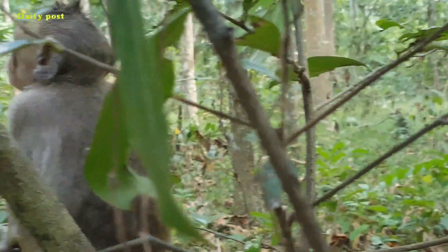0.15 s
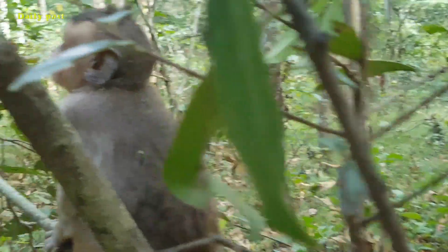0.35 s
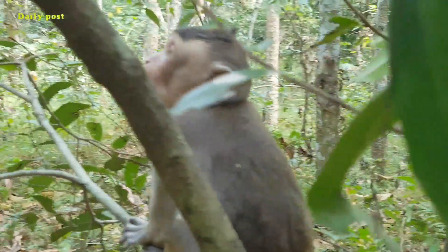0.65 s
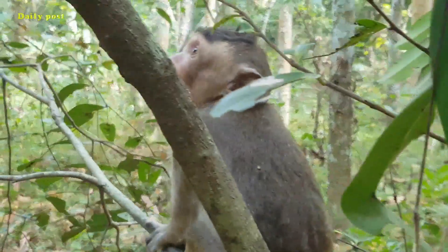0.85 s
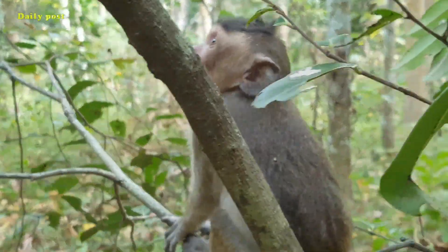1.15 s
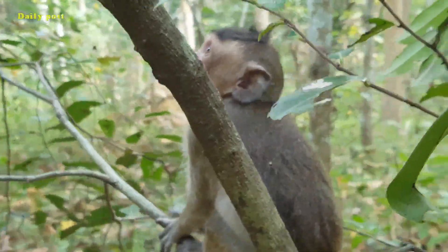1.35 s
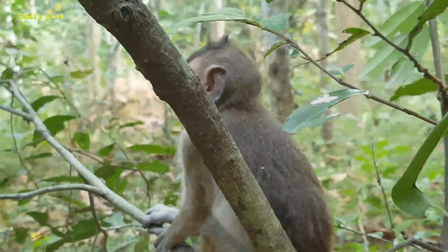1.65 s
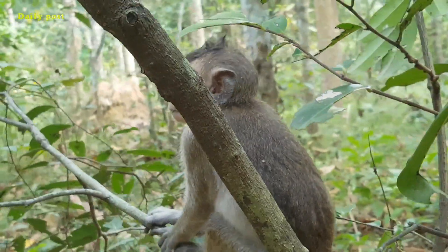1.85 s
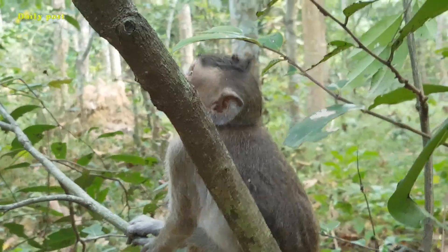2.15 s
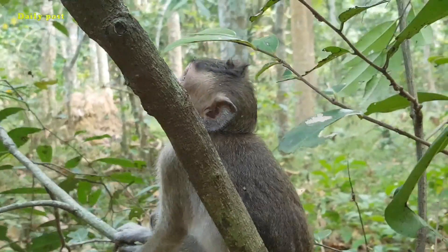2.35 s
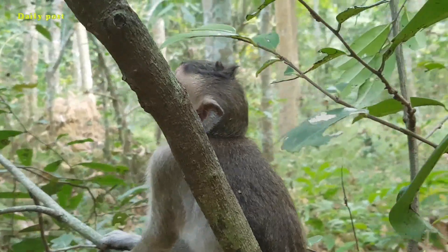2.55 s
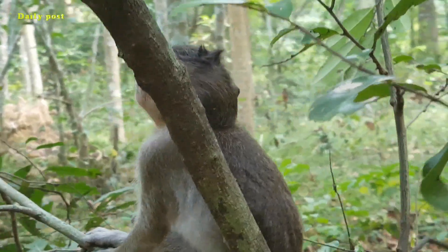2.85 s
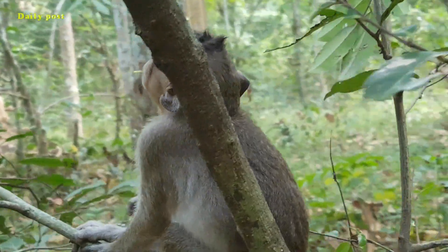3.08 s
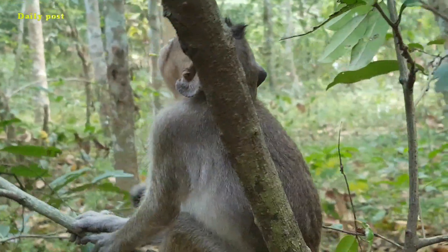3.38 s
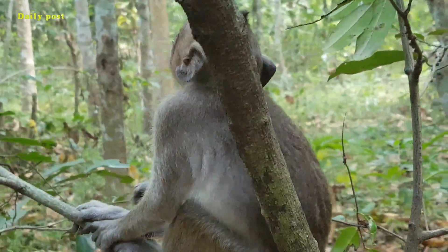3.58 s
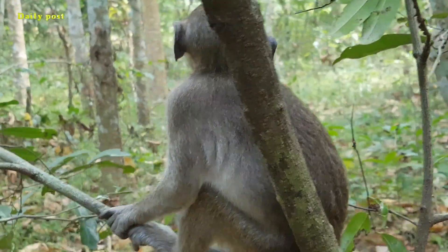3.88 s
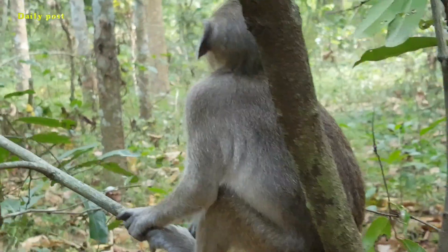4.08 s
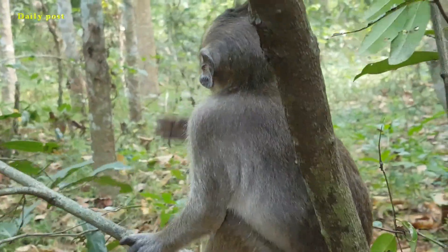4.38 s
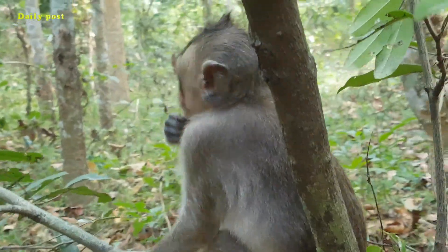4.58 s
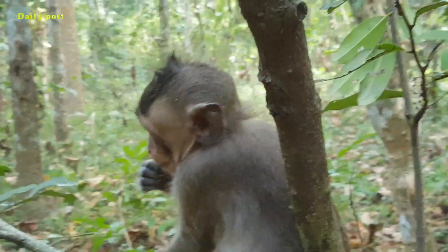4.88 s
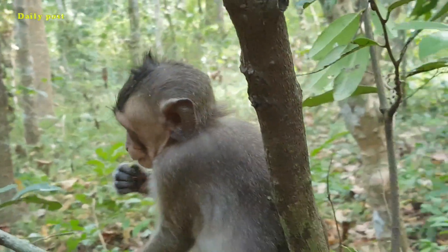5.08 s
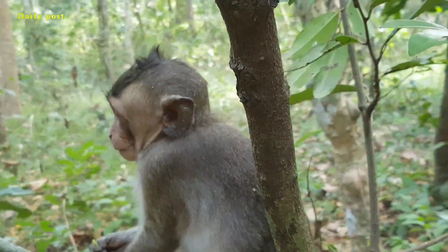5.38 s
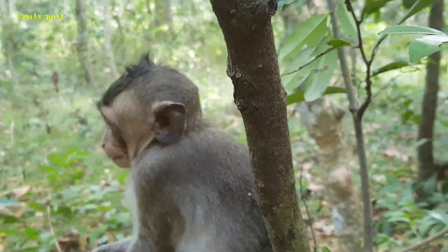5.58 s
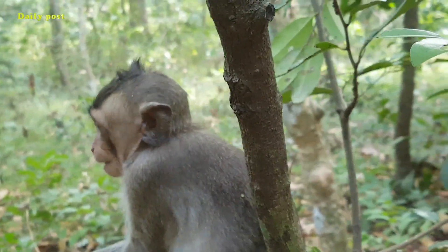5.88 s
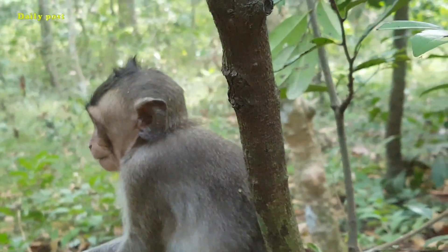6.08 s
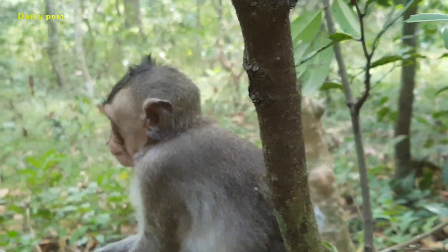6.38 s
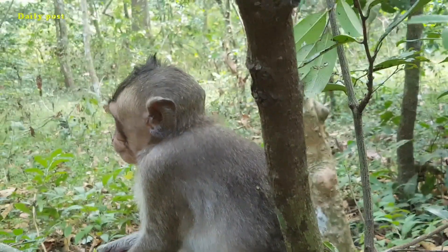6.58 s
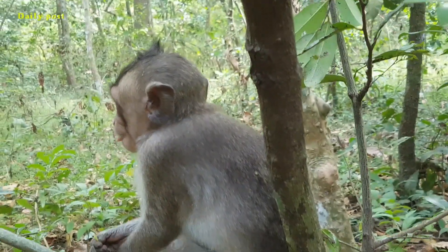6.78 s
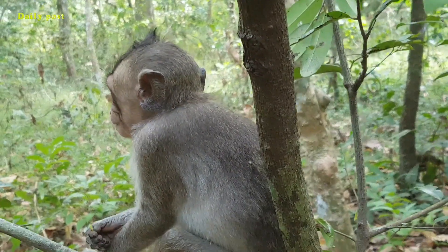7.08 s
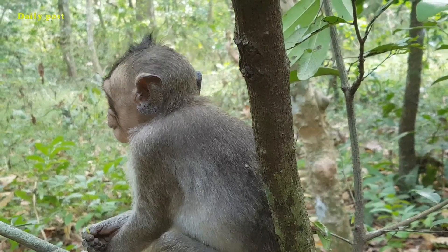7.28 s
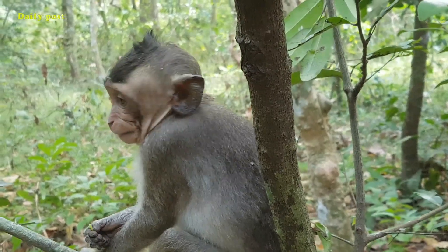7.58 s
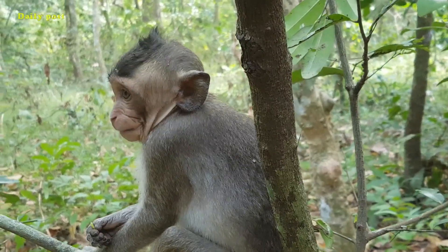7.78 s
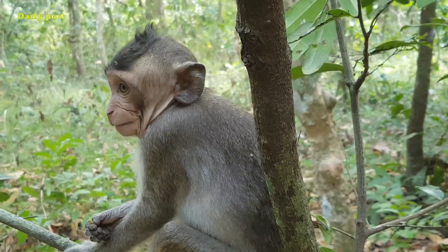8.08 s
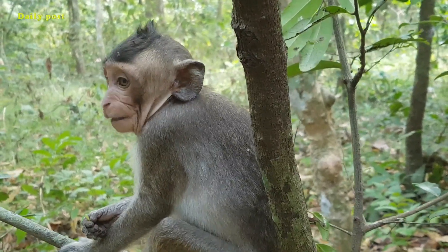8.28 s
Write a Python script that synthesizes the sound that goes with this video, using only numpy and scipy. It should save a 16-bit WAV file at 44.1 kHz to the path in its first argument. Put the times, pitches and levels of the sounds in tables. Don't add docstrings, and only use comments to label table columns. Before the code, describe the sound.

A dense, shrill cicada chorus drones continuously through a forest, its tones beating and shimmering, over faint insect hiss, soft air and low rumble. Close to the microphone, dry leaves rustle in uneven bursts as a small monkey shifts on a branch. Stalks crack early and near three seconds; a twig snaps sharply just after four. A light rustle follows around six, then mostly insects remain.

```python
import sys
import numpy as np
from scipy import signal
from scipy.fft import rfft, irfft
from scipy.io import wavfile
from scipy.ndimage import uniform_filter1d

SR = 44100
rng = np.random.default_rng(int(sys.argv[2]) if len(sys.argv) > 2 else 0)


def transcribe(u):
    v = np.clip(np.atleast_2d(u).T, -1, 1)
    q = np.round(v * 32767).astype(np.int16)
    wavfile.write(sys.argv[1], SR, q)


def undo_db(level):
    steps = np.asarray(level, float) / 20
    return 10 ** steps


N = 372644


def level(x, db):
    return x * undo_db(db) / np.sqrt(np.mean(x ** 2))


def curve(table):
    s, *columns = np.transpose(table)
    return [np.interp(np.arange(N) / SR, s, c) for c in columns]


def on_hz(points, n):
    hz, value = np.transpose(points)
    return np.interp(np.log(np.arange(n // 2 + 1) * SR / n + 1), np.log(hz), value)


def colour(x, points):
    cepstrum = irfft(on_hz(points, 2048) * np.log(10) / 20)
    cepstrum[1:1024] *= 2
    response = irfft(np.exp(rfft(cepstrum[:1025], 2048)))
    return signal.fftconvolve(x, response[None], axes=1)[:, :N]


def walk(rate_hz, n=N):
    hold = int(SR / rate_hz)
    held = np.repeat(rng.standard_normal(n // 200), hold)[:n]
    return 1.3 * uniform_filter1d(uniform_filter1d(held, hold), hold)


def sides(x, pan_db, lag):
    return np.array([np.roll(x, lag) * undo_db(pan_db / 2), x * undo_db(-pan_db / 2)])


# multiple_of_stroke_rate, level_db
STROKE = [(1, -42), (2, -38), (3, -43), (4, -23), (5, 4.5), (6, -18.5), (7, -38), (8, -27), (9, -22),
          (10, 4), (11, -14), (12, -24.5), (13, -25), (14, -16.5), (15, -0.5), (16, -16.5), (17, -20.5),
          (18, -30), (19, -28.5), (20, -4), (21, -18.5), (22, -25), (23, -24), (24, -30), (25, -17.5),
          (26, -26), (27, -36), (28, -40), (29, -37)]
INSECTS = 7


def crowd(n, rate_hz, spread, wander, db, tilt_db, swell_db):
    order = np.arange(len(STROKE)) + 1
    gain = undo_db(np.array(STROKE)[:, 1] + tilt_db * np.log2(order / 5))
    out = np.zeros(n)
    for place in np.linspace(-1.5, 1.5, INSECTS):
        phase = 2 * np.pi * rng.random(len(order))
        shape = irfft(np.r_[0, gain * np.exp(1j * phase)], 2048)
        hz = rate_hz * (1 + spread * place + wander * walk(22, n))
        cycle = np.cumsum(hz) / SR % 1
        out += np.interp(cycle, np.arange(2049) / 2048, np.r_[shape, shape[0]])
    return level(out, db) * undo_db(swell_db * np.linspace(-.5, .5, n))


# stroke_rate_hz, spread_between_insects_share, wander_share, level_db, tilt_db_per_octave,
# swell_start_to_end_db
CROWDS = [(543.03, .0022, .005, 0, 0.5, -7.7), (528.2, .009, .012, -10.5, 2.5, -4),
          (562.8, .016, .02, -16.5, -2, -0.5), (502.6, .018, .025, -21, -3, 1.5)]
# start_s, rib_tone_level_db, left_minus_right_db
CHORUS = [(0, -39, 2.5), (.5, -38, 3.5), (1, -37, 6), (1.5, -40.5, 5), (2, -37.5, 4), (2.4, -40.5, 4),
          (2.75, -36.5, 4.5), (3.2, -39, 3), (3.7, -40, 3), (4.3, -38, 3.5), (4.8, -40.5, 4),
          (5.4, -38.5, 3.5), (5.9, -39, 4.5), (6.4, -38.5, 2.5), (6.9, -38.5, 4.5), (7.5, -42, 3.5),
          (8, -39.5, 3.5), (8.45, -41.5, 3)]
SPLIT_HZ = [0, 4000, 6800, 9500, 22050]
# level_at_mean_effort_db, effort_followed_share, lean_followed_share, own_swell_db
TONES = [(-39, 1.13, 1.08, 1.13), (-40, 0.35, 0.58, 0.97), (-45, .1, 1.08, 1.75),
         (-44.5, 0.13, 0.033, 2.17)]
EFFORT_DB, SWAY_DB, SWELLS_HZ = -39, 1.5, 9
FOREST_T60_S, STEADY_S = 0.86, 0.16


def cicadas():
    song = sum(crowd(N + SR, *row) for row in CROWDS)
    decay = undo_db(-60 * np.arange(SR) / SR / FOREST_T60_S)
    scatter = rfft(rng.standard_normal((2, SR)) * decay, N + SR)
    scrambled = irfft(rfft(song) * scatter / abs(scatter), N + SR)
    wash = rfft(scrambled[:, SR:])
    hz = np.arange(wash.shape[1]) * SR / N
    effort_db, lean_db = curve(CHORUS)
    out = 0
    for lo, hi, (mean_db, follow, share, swell_db) in zip(SPLIT_HZ, SPLIT_HZ[1:], TONES):
        db = mean_db + follow * (effort_db - EFFORT_DB) + swell_db * walk(SWELLS_HZ)
        pan_db = lean_db + SWAY_DB * walk(SWELLS_HZ)
        tone = irfft(wash * ((hz >= lo) & (hz < hi)), N)
        tone = tone / tone.std(axis=1, keepdims=True)
        slow_power = uniform_filter1d(tone.mean(axis=0) ** 2, int(STEADY_S * SR))
        tone = tone / np.sqrt(slow_power + 0.047)
        out = out + tone * undo_db(db + share * np.array([pan_db, -pan_db]) / 2)
    return out


# centre_hz, width_hz, level_db,
# left_minus_right_db
FAR_BANDS = [(6920, 100, -63, 1.5), (4220, 73, -75, 13), (6340, 190, -62, 1), (1700, 190, -70, -16),
             (6800, 680, -75, 1), (8360, 150, -62.5, 1), (2985, 130, -63.5, 11), (14900, 700, -69, 14)]


def far_insects():
    hz = np.arange(N // 2 + 1) * SR / N
    out = 0
    for centre_hz, width_hz, db, pan_db in FAR_BANDS:
        bell = np.exp(-((hz - centre_hz) / width_hz) ** 2)
        band = irfft(rfft(rng.standard_normal((2, N))) * bell, N)
        out = out + level(band, db) * undo_db(np.array([[pan_db], [-pan_db]]) / 2)
    return out


# frequency_hz, density_db_per_hz
AIR = [(20, 0), (35, -16.5), (52, 2.5), (75, -2), (110, -2.5), (170, -8.5), (240, -16.5), (500, -16.5),
       (1200, -21.5), (2000, -23.5), (3800, -21), (7300, -34), (12000, -21), (15800, -26.5)]
# frequency_hz, common_share
ALIKE = [(20, 0.84), (60, 1), (130, 0.9), (290, .58), (640, 0.42), (1410, 0), (3100, 0.18), (20000, 0.097)]
AIR_DB, HUM_HZ, HUM_DB = -50.5, 51, -69.5


def air():
    mid, side = rfft(rng.standard_normal((2, N))) * undo_db(on_hz(AIR, N))
    alike = np.clip(on_hz(ALIKE, N), 0, 1)
    mid, side = mid * np.sqrt(1 + alike), side * np.sqrt(1 - alike)
    noise = irfft(np.array([mid + side, mid - side]), N)
    hum_phase = 2 * np.pi * np.cumsum(HUM_HZ + 1.5 * walk(2.5)) / SR
    hum = undo_db(HUM_DB + 3 * walk(5)) * np.sin(hum_phase)
    return level(noise, AIR_DB) * undo_db(0.28 * walk(1.28)) + hum


# loudest_s, level_db, rise_s, settle_s
STIRS = [(.02, -46, 0.022, 0.032), (.4, -51.5, 0.28, 0.13), (.52, -47, 0.097, 0.032),
         (.69, -42.5, 0.16, 0.17), (.745, -46, .12, .15), (.83, -44, 0.13, .14), (1.31, -58.5, 0.23, 0.46),
         (2.02, -51.5, 0.062, 0.45), (2.42, -63, .15, 0.13), (2.64, -39.5, .13, 0.18),
         (2.75, -46, .1, 0.056), (2.85, -41, 0.19, 0.12), (3.04, -52, 0.052, 0.22), (3.32, -45, 0.22, 0.11),
         (3.43, -52, 0.041, .22), (3.69, -57.5, 0.47, .25), (3.93, -50, 0.16, 0.12),
         (4.17, -44, 0.05, 0.24), (4.24, -39.5, 0.19, .2), (4.349, -33, 0.042, 0.05),
         (4.44, -42.5, .1, .17), (4.89, -54, 0.73, 0.21), (5.13, -56.5, 0.083, .55),
         (6.05, -50.5, 0.029, 0.13), (6.19, -49, 0.17, 0.082), (6.26, -43.5, 0.098, 0.11),
         (6.38, -52, .2, 0.16), (6.54, -49, 0.054, .03), (6.73, -62.5, .11, 0.097), (8.45, -64, 0.082, .1)]
STIR_SPAN_DB = 20
STILL_DB = -73.5
NEAR_DB, NEAR_PAN_DB, PAN_PER_DB = -43.5, 0, 0.33
RISE_DRY_DB = .5


def stirring():
    t = np.arange(N) / SR
    power = undo_db(STILL_DB) ** 2
    for s, db, rise_s, settle_s in STIRS:
        distance = np.maximum((s - t) / rise_s, (t - s) / settle_s)
        power = power + undo_db(db - STIR_SPAN_DB * distance) ** 2
    near_db = 10 * np.log10(power)
    pan_db = NEAR_PAN_DB + PAN_PER_DB * (near_db - NEAR_DB)
    dry_db = RISE_DRY_DB * np.tanh(np.gradient(near_db) * SR / 100)
    return near_db, pan_db, dry_db


# frequency_hz, level_db
LEAF = [(200, -15.5), (360, -10), (565, -3.5), (1000, -1.5), (1580, 1.5), (2390, -2), (3500, -5),
        (4500, -5.5), (6000, -6.5), (9000, -17.5), (15000, -16)]
PORT_LAG = 4


def leaves():
    near_db, pan_db, dry_db = stirring()
    hz = np.arange(N // 2 + 1) * SR / N
    shared = walk(35)
    close = 0
    for centre_hz in 250 * 2 ** np.arange(0, 6.1, .5):
        chance = rng.random((2, N))
        size_db = np.minimum(-2.5 * np.log(chance[1]), 7)
        struck = chance[0] < 400 / SR
        grains = struck * undo_db(size_db) * rng.standard_normal(N)
        ring = 1 / (1 + 1j * 1.86 * (hz / centre_hz - centre_hz / (hz + 1))) ** 2
        close = close + rfft(level(grains, 0)) * ring
    close = sides(level(irfft(close, N), 0), pan_db, PORT_LAG)
    swish = level(rng.standard_normal((2, N)), -3.5) * undo_db(np.array([pan_db, -pan_db]) / 2)
    litter = level(colour(close + swish, LEAF) * undo_db(1.3 * shared), 1.5)
    crisp = irfft(rfft(litter) / (1 + (2900 / (hz + 1)) ** 8), N)
    return (litter + (undo_db(dry_db) - 1) * crisp) * undo_db(near_db)


# frequency_hz, density_db_per_hz
BRANCH = [(60, -20), (130, 0.5), (220, -2.5), (400, -11.5), (1000, -33)]
BRANCH_DB, BRANCH_LINGER_S = -15, 0.34


def branch():
    noise = rfft(rng.standard_normal(N)) * undo_db(on_hz(BRANCH, N))
    rumble = level(irfft(noise, N), BRANCH_DB)
    return rumble * uniform_filter1d(undo_db(stirring()[0]), int(BRANCH_LINGER_S * SR))


# start_s, peak_db, ring_hz, left_minus_right_db
CRACKS = [(0.262, -39, 1900, 0.5), (0.427, -42.5, 600, -1.0), (0.654, -37, 1710, -3.5),
          (0.811, -31.5, 1240, -2.5), (2.022, -42, 1530, -3.0), (2.594, -35, 1610, -6),
          (2.632, -33, 1580, -4), (2.717, -40, 1750, -2.5), (2.748, -34, 1570, -2.5),
          (2.809, -34, 1690, -1.0), (2.839, -42, 1900, -2), (2.866, -32, 1280, -3.0),
          (3.023, -36.5, 1630, -4), (3.093, -40, 930, -4.5), (3.296, -36, 1700, -4.0),
          (3.438, -38, 1750, -2.0), (3.509, -37, 1940, -2.0), (4.165, -37, 1730, -4),
          (4.203, -36, 1540, -5), (4.23, -31, 1750, -2.5), (4.285, -37, 1700, -1.0),
          (4.334, -27.5, 1080, -2.0), (4.424, -30, 1590, -1.5), (4.883, -39, 1760, -3.0),
          (6.258, -34.5, 1680, -15), (6.433, -34, 1760, 6), (6.722, -39.5, 1800, -7),
          (6.749, -46.5, 1790, -17), (7.271, -44, 2170, -1.5), (7.346, -45.5, 1020, 6)]
TICK_DB, TICK_PER_OCTAVE_DB = -8, 15


def cracks():
    out = np.zeros((2, N + SR))
    t = np.arange(900) / SR
    noises = rng.standard_normal((len(CRACKS), 900))
    for (s, db, hz, pan_db), noise in zip(CRACKS, noises):
        roughness = 1 + .4 * uniform_filter1d(noise, size=20)
        ring = np.sin(2 * np.pi * hz * t) * undo_db(-60 * t / 0.025) * roughness
        tick_db = TICK_DB + TICK_PER_OCTAVE_DB * np.log2(hz / 1600)
        tick = undo_db(tick_db) * noise * undo_db(-60 * t / 0.019)
        i = int(s * SR)
        out[:, i:i + 900] += sides(undo_db(db - 0.5) * (ring + tick), pan_db, PORT_LAG)
    return out[:, :N]


# frequency_hz, level_db
TWIG = [(150, -47), (250, -18), (985, -21), (1870, -4), (2790, -7), (4700, 11), (5500, -36), (9910, -4),
        (12900, 3.5), (15800, -19)]
SNAP_S = [
    4.3333,
    4.3353,
    4.3445,
    4.3635,
    2.838,
    .801,
    .816,
]
SNAP_DB = [-14, -17, -29, -35, -15, -18, -27]
SNAP_BLUNT = [1, 1, 1, 1, 3, 3, 3]


def twig():
    out = np.zeros(N)
    t = np.arange(600) / SR
    noises = rng.standard_normal((len(SNAP_S), 600))
    for s, db, blunt, noise in zip(SNAP_S, SNAP_DB, SNAP_BLUNT, noises):
        i = int(s * SR)
        out[i:i + 600] += undo_db(db) * uniform_filter1d(noise, blunt) * undo_db(-60 * t / .004)
    return colour(sides(out, -3.2, PORT_LAG), TWIG)


def scene():
    return cicadas() + far_insects() + air() + leaves() + branch() + cracks() + twig()


def top_cut(x):
    return signal.sosfilt(signal.butter(12, 15760, fs=SR, output="sos"), x)


def record(dry):
    return top_cut(dry)


dry = scene()
out = record(dry)
transcribe(out)
```